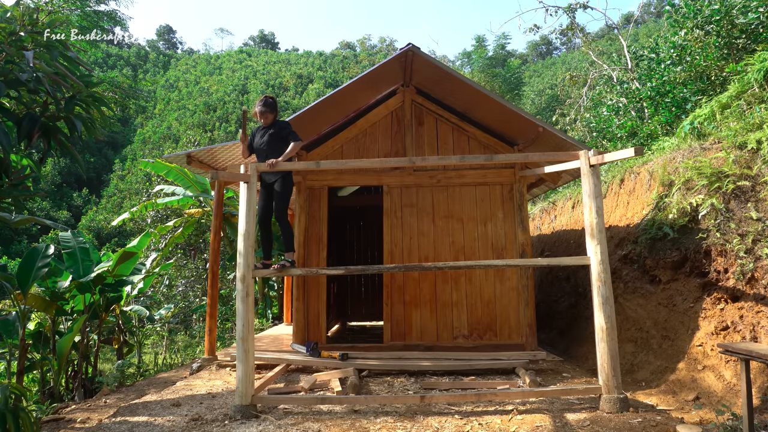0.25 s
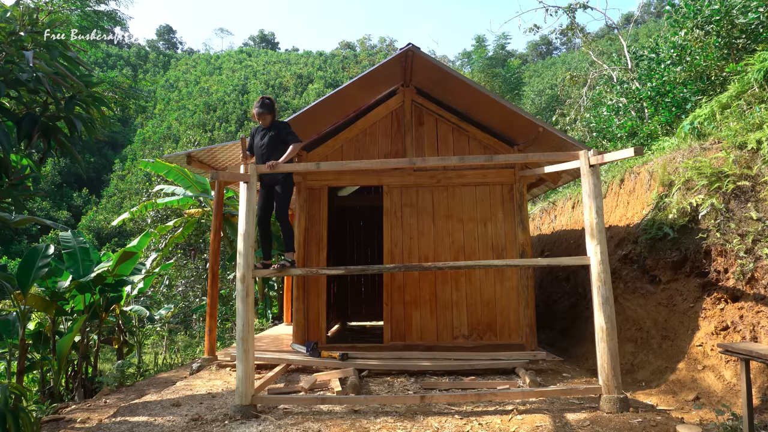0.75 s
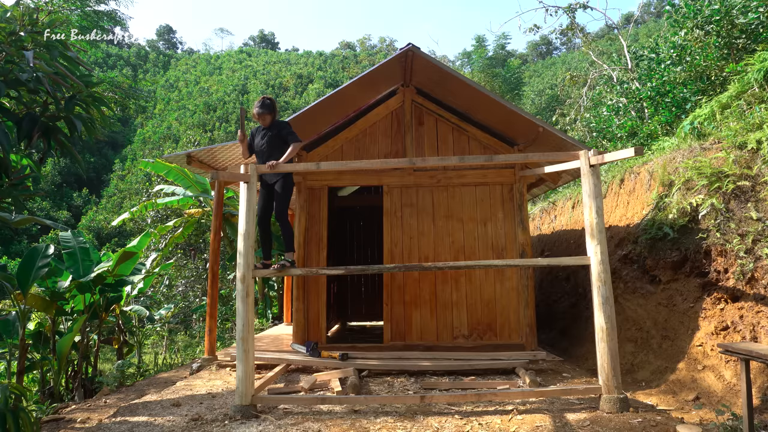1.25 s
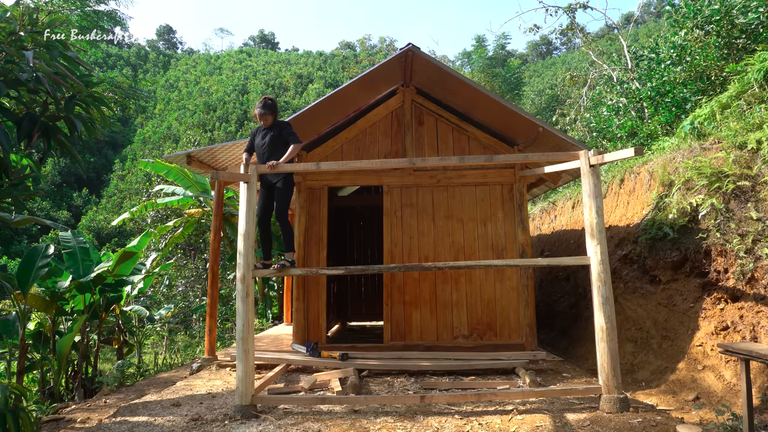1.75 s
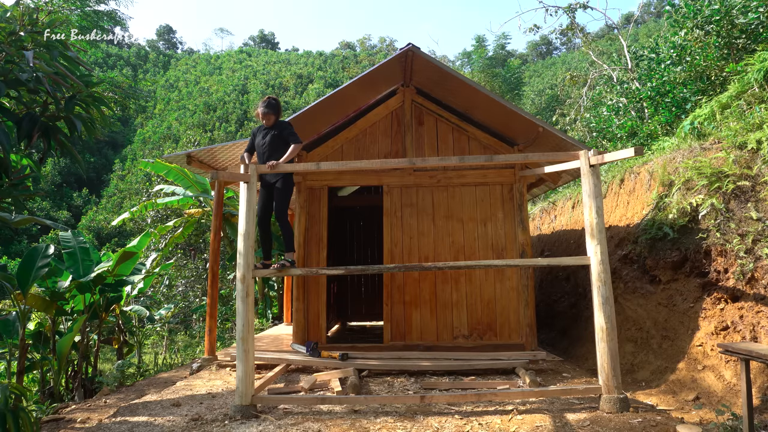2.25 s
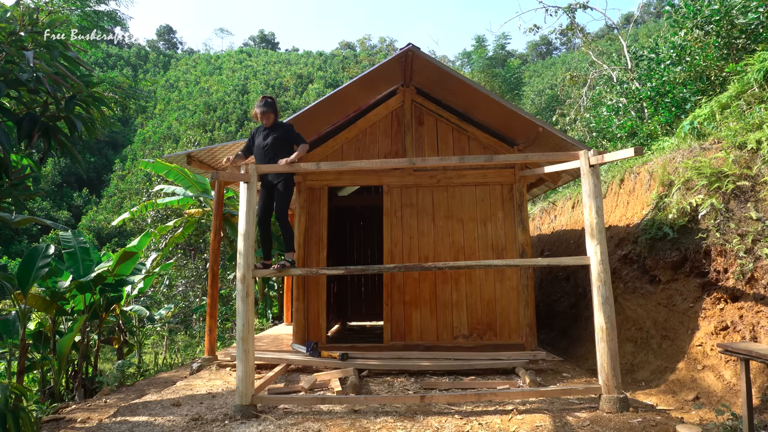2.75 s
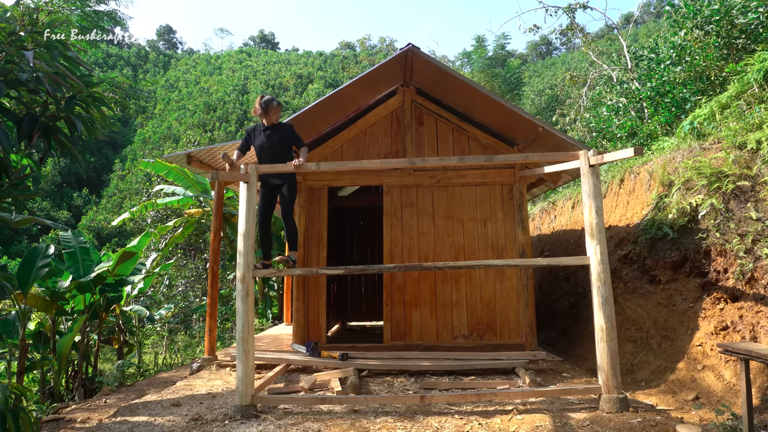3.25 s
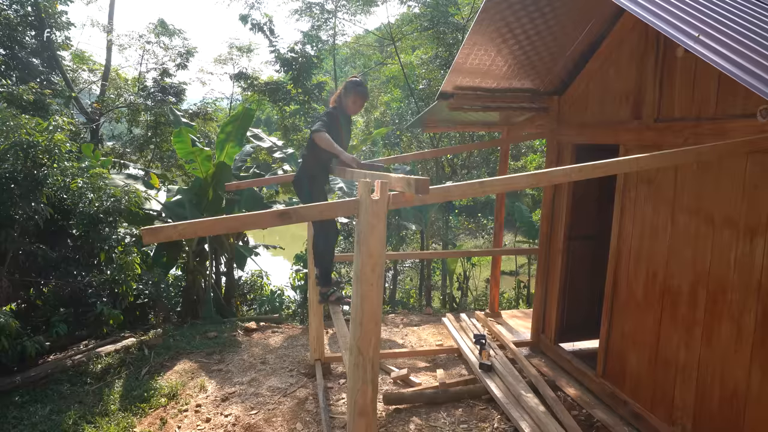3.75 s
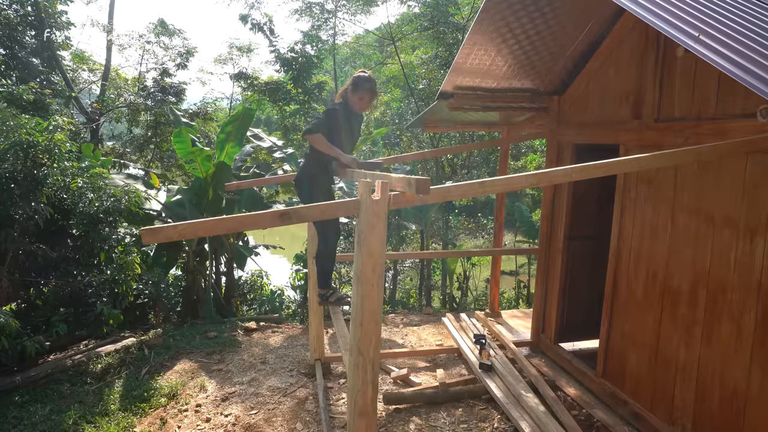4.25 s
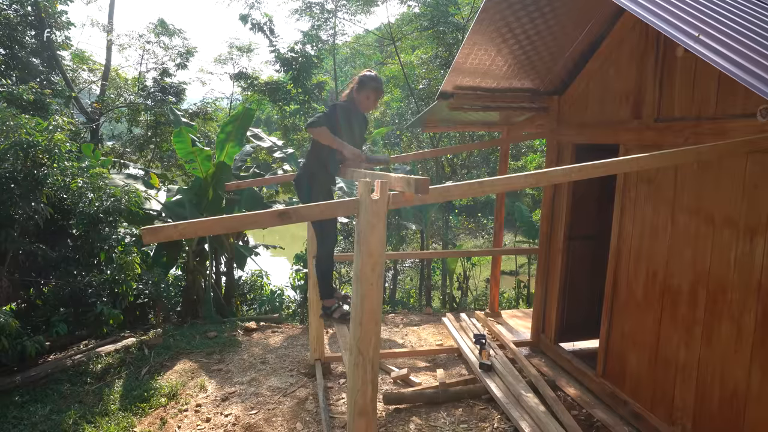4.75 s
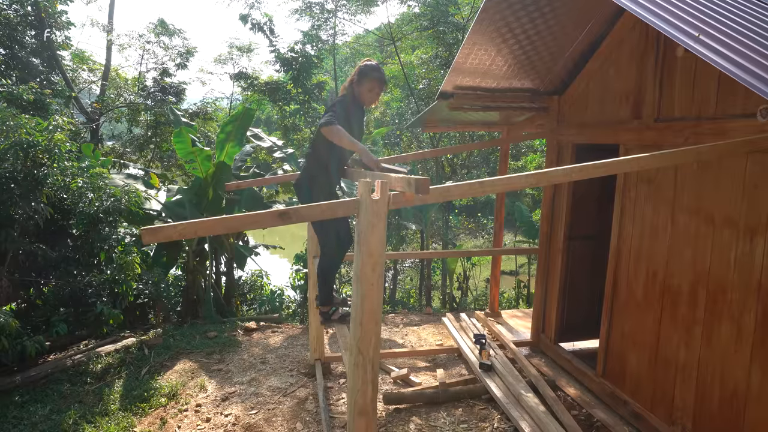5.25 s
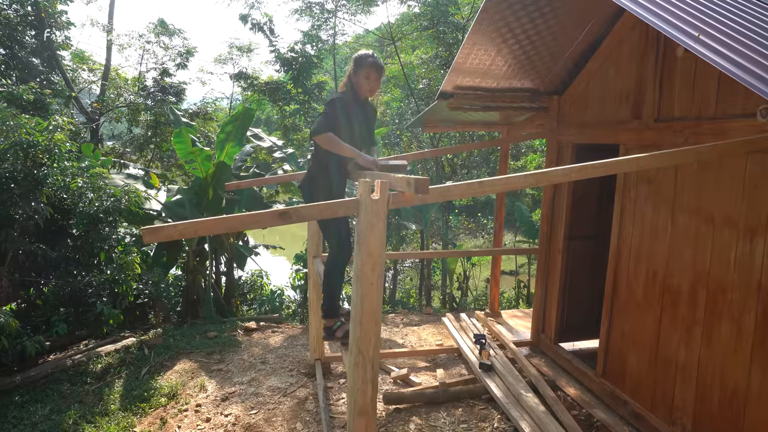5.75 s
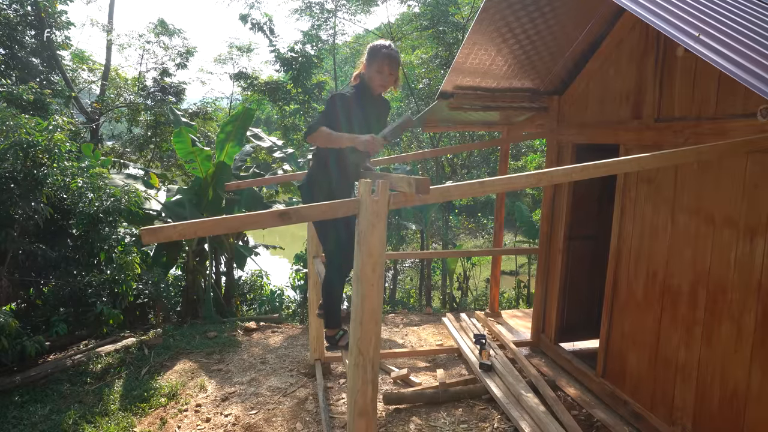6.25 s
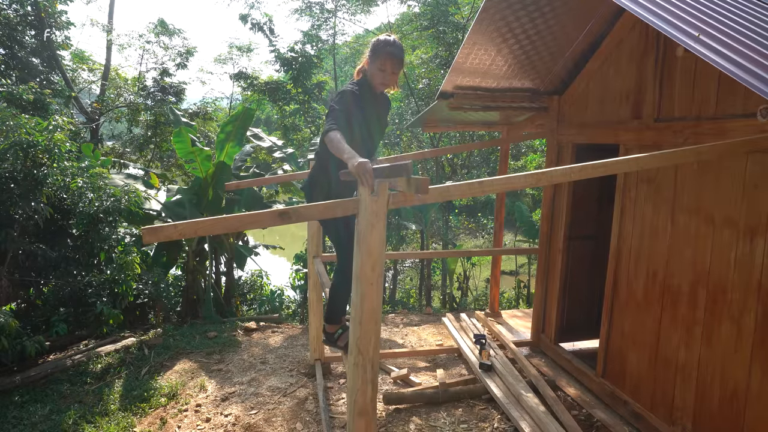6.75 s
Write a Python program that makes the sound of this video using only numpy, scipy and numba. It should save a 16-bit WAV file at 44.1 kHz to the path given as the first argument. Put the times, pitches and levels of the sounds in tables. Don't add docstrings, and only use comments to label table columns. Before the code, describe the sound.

Sharp steel-on-nail cracks with woody, resonant knocks, heard from a little way off, fill the first two and a half seconds, their loud peaks flattened and their tails scattered around a hut. Then the view is nearer and much quieter: dull timber set-downs, tiny clicks, short scrapes and a low drag. A high cicada shimmer, pulsing crickets, tiny whistled bird peeps and airy leaf hiss surround it in wide stereo.

```python
import sys
import numpy as np
from scipy import signal
from scipy.fft import rfft, irfft, next_fast_len
from scipy.io import wavfile
from scipy.ndimage import uniform_filter1d, map_coordinates
from numba import njit

SR = 44100
rng = np.random.default_rng(int(sys.argv[2]) if len(sys.argv) > 2 else 0)


def dump_mix(stems):
    frames = np.atleast_2d(stems).T
    limited = np.clip(frames, -1, 1)
    pcm = np.round(limited * 32767).astype(np.int16)
    wavfile.write(sys.argv[1], SR, pcm)


def gain_from_db(level_db):
    decades = np.asarray(level_db, float) / 20
    return 10 ** decades


N = 309582
LEAD = 22050
CUT_S = 3.535

# start in seconds, strength in dB, crack in dB, boom in dB, scatter in dB.
BLOWS = [(-.44, 0, 0, -11, -5.5), (.105, -26.5, -31, -7, 18), (0.5463, -3, -0.5, -13.5, -9),
         (0.622, -19.5, -12, -7.5, -22), (.702, -21.5, -24, -8, -8), (0.9595, -6, -5, -21.5, -9.5),
         (1.4381, -3.5, -3, -19.5, -9.5), (1.509, -13, -3, -20, -15.5), (1.7827, -10.5, -1, -20.5, -12),
         (2.277, 0, -9.5, -33.5, -9.5), (2.343, -12.5, -22, -23, -25)]
# start in seconds, strength in dB, brightness in dB per octave, boom in dB, scatter in dB.
THUDS = [
    (.052, -16, 5, -31, -38),
    (.068, -24, 0.5, -9, -32),
    (2.891, -41.5, 0.5, -5, -13),
    (3.713, -34, -1, -9.5, -11),
    (3.727, -30, 0, -17.5, -45),
    (5.334, -38.5, -6, -13, -1),
    (5.358, -39.5, -7, -2.5, -15),
    (6.65, -41.5, 2, 0.5, -36),
    (6.745, -46.5, -3.5, -19, -4),
]
# start in seconds, peak in dB, centre in Hz, width in octaves, t60 in seconds.
TICKS = [(0.0498, -21, 2600, 1.3, 0.014), (0.0573, -25, 11000, 1.3, .012), (.0655, -27, 8300, 1.1, 0.013),
         (0.1025, -33, 5950, 0.85, 0.014), (0.717, -23.5, 363, 0.98, 0.42), (.72, -44, 4000, 0.87, 0.084),
         (3.386, -45, 2670, 0.29, 0.013), (3.39, -48, 600, 1.3, 0.085), (3.398, -52, 2500, 0.4, 0.03),
         (3.713, -40, 4970, 0.78, 0.021), (4.128, -37, 9100, 1.9, 0.019), (4.312, -44.5, 1060, 1.2, 0.13),
         (4.334, -61, 1390, 0.41, 0.13), (4.732, -50, 3000, 1.4, .03), (5.33, -50.5, 2290, 0.55, 0.082),
         (5.431, -36.5, 1200, 0.39, 0.037), (5.63, -50, 1420, 0.65, 0.33), (5.68, -35.5, 3520, 0.86, 0.057),
         (5.69, -32.5, 3600, 2.6, 0.033), (5.955, -47, 7000, 1.1, .03), (6.528, -46.5, 1140, 0.36, 0.094),
         (6.648, -46, 2200, 0.81, 0.033), (6.747, -42, 2190, .6, 0.032), (6.773, -28, 174, 0.22, 0.19)]
# middle in seconds, length in seconds, level in dB, centre in Hz, width in octaves.
SCUFFS = [
    (3.608, 0.14, -59.5, 4960, 0.76),
    (3.964, 0.048, -62, 2700, 0.37),
    (4.255, 0.034, -54, 2500, 0.64),
    (5.973, 0.29, -53.5, 6000, 2.1),
    (4.354, 0.08, -60, 1500, 1),
    (5.35, 0.054, -59, 2480, 0.52),
    (5.71, 0.063, -51, 2450, 0.84),
    (6.148, 0.41, -56, 640, 1),
    (6.27, 0.034, -53.5, 1410, 1.1),
    (6.511, 0.052, -52, 1920, 0.92),
]
# start in seconds, length in seconds, from in Hz, to in Hz, level in dB.
BIRDS = [
    (2.862, .035, 2600, 4500, -66),
    (3.458, .05, 3250, 4700, -60),
    (4.18, .04, 3350, 3340, -67),
    (4.4, .03, 3600, 3590, -67),
    (5.385, .04, 3200, 3190, -64),
    (4.585, .045, 2750, 2760, -64),
    (5.94, .05, 2700, 2750, -64),
    (6.39, .06, 4400, 3100, -63),
    (6.855, .04, 3900, 3200, -63),
]
# frequency in Hz, level in dB per Hz.
AIR_COLOUR = [(25, -1.5), (60, 1.5), (300, 0), (1000, -5), (3000, -12.5), (7000, -28), (15500, -46)]
# frequency in Hz, left-right likeness (1 is the same).
AIR_LIKENESS = [(60, 1), (130, 0.74), (290, 0.52), (640, 0.29), (1410, 0.084), (3100, 0.28), (6820, 0.76),
                (15000, 0.39)]
# frequency in Hz, level in dB per Hz.
TIMBER_COLOUR = [(71, -71), (120, -21.5), (410, -15), (592, 0), (773, -8), (988, -2), (1120, -2.5),
                 (1290, -1), (1370, -4), (1580, -2), (1750, -6.5), (2530, -14.5), (16000, -44)]
# frequency in Hz, level in dB per Hz.
BEAM_COLOUR = [(71, -29), (120, -2), (280, -7), (404, -7), (671, -3), (1440, -18.5), (1540, -23.5),
               (2530, -23), (3500, -42.5), (4550, -57), (7700, -120)]
# frequency in Hz, width in Hz, height over the broad sound in dB.
FRAME_MODES = [(286, 46, 11.5), (473.5, 14.5, 10.5), (592.6, 15, 6.5), (616, 27, 6.5), (745, 41, 8),
               (842, 10, 7), (998, 78, 4), (1113, 38, 3.5), (1321, 29, 4), (1418, 21, 1.5), (1834, 23, -2),
               (2080, 13, 5.5), (2120, 25, -5), (2304, 35, 4)]
# frequency in Hz, level in dB per Hz.
STEEL_COLOUR = [(300, -18), (1200, 3.5), (2100, 25), (3500, 0.5), (8000, 4), (10500, -11), (13000, -10),
                (16000, -31)]
# frequency in Hz, t60 in seconds.
KNOCK_DECAY = [(100, 1), (500, 0.29), (1500, 0.17), (4000, 0.11), (12000, 0.11)]
# frequency in Hz, t60 in seconds.
YARD_DECAY = [(100, 1), (300, 1), (600, 0.75), (1300, 0.89), (2200, 0.74), (4000, 0.69), (10000, 0.82)]
# delay in seconds, level in dB, rise in seconds, fade in seconds, centre in Hz.
ECHOES = [
    (.075, -24.5, 0.0057, 0.037, 2100),
    (.17, -34.5, 0.015, 0.084, 1000),
    (.27, -42, 0.058, 0.12, 1270),
    (0.404, -42, 0.015, 0.11, 1300),
    (.5, -45.5, 0.02, 0.17, 1400),
]
# frequency in Hz, left-right likeness (1 is the same).
SCATTER_LIKENESS = [(60, 1), (130, 1), (290, 1), (640, 0.98), (1410, 0.8), (3100, 0.49), (6820, 0.12),
                    (15000, 0.092)]
# frequency in Hz, left minus right in dB.
LEFT_OVER_RIGHT = [(200, 0), (500, .8), (2400, .8), (4400, 2), (8000, 2.5), (15000, 5)]
# frequency in Hz, level in dB per Hz.
LEAF_COLOUR = [(1500, -10.5), (3000, -0.5), (6000, -2.5), (9600, -3.5), (12000, -6), (15500, -9)]
# frequency in Hz, width in Hz, height in dB.
HUT_MODES = [(59.6, 42, -5), (79.6, 10.4, -2.5), (107.2, 9, 0), (161.6, 13.4, -5.5), (233.5, 68, -6.5)]
# time in seconds, strength in dB.
GUSTS = [
    (0, 12.5),
    (.3, 6.5),
    (1.3, 0),
    (2.2, -1),
    (3.3, 0),
    (4.2, 1.7),
    (5, -0.1),
    (5.8, 2.2),
    (6.5, -0.2),
    (7.02, -0.2),
]
# start in seconds, length in seconds, level in dB.
LOW_PHRASES = [
    (.55, .3, -66),
    (5.15, .5, -74),
    (6.2, .9, -67),
]
# start in seconds, length in seconds, level in dB.
HIGH_PHRASES = [
    (2.42, 0.33, -71.5),
    (4.65, .45, -67.5),
    (5.7, .3, -82),
    (6.35, 0.46, -69),
]


def timber():
    track = new_track()
    for s, db, crack_db, *room in BLOWS:
        tilt_db = 1.52 + 0.3234 * db
        blow = strike(TIMBER_COLOUR, crack_db, tilt_db, *room, stretch=0.63, echo_db=-2)
        add(track, gain_from_db(db - 5.5) * blow, s)
    for s, db, *blow in THUDS:
        add(track, gain_from_db(db) * strike(BEAM_COLOUR, -60, *blow, stretch=0.65, echo_db=-6), s)
    return track[:, LEAD:LEAD + N]


def strike(body, crack_db, tilt_db, boom_db, yard_db, stretch, echo_db):
    lumps = gain_from_db(1.5 * wobble(160)[:SR] + 0.4 * wobble(35)[:SR])
    noise = lumps * stereo(rng.standard_normal((2, SR)), SCATTER_LIKENESS)
    hz, t, z = signal.stft(noise, SR, nperseg=128)
    tail_power = gain_from_db(2 * yard_db - 120 * t / (stretch * along(YARD_DECAY, hz)[:, None]))
    for delay, db, rise, fade, centre_hz in ECHOES:
        shape = np.exp(-((t - delay) / np.where(t < delay, rise, fade)) ** 2)
        echo_colour = bell(centre_hz, 0.9)(hz)[:, None]
        tail_power = tail_power + gain_from_db(2 * (db + echo_db + echo_colour)) * shape
    knock_gain = gain_from_db(-60 * t / (stretch * along(KNOCK_DECAY, hz)[:, None]))
    knock = signal.istft(z * knock_gain, SR, nperseg=128)[1][:, :SR]
    tail = signal.istft(z * np.sqrt(tail_power), SR, nperseg=128)[1][:, :SR]

    modes = peaks(FRAME_MODES, 0.53)

    def tone(f):
        low_cut = 20 * np.log10((f * f + 1) / (f * f + 70 ** 2))
        return along(body, f) + tilt_db * np.log2(np.maximum(f, 150) / 800) + low_cut

    wood = coloured(knock, lambda f: tone(f) + 5 * np.log10(1 + modes(f)))
    wood = wood + coloured(tail, lambda f: tone(f) + 10 * np.log10(1 + modes(f)))
    wood = wood / np.sqrt(np.mean(wood[:, :SR // 20] ** 2))
    t = np.arange(SR) / SR
    wood = wood * (1 - 0.74 * np.exp(-(t / 0.002) ** 2))

    crack_noise = gain_from_db(crack_db - 60 * t / 0.0068) * rng.standard_normal(SR)
    crack = coloured(crack_noise, lambda f: along(STEEL_COLOUR, f))

    hollow = peaks(HUT_MODES, 1.5)
    boom = unit(coloured(rng.standard_normal(SR),
                         lambda f: 20 * np.log10(hollow(f) * (f ** 4 + 1) / (f ** 4 + 60 ** 4))))
    swing = 1 - np.exp(-t / 0.08)
    boom = gain_from_db(boom_db + 6.5 - 60 * t / (1.11 * stretch)) * swing * boom
    return wood + boom + crack * gain_from_db([[2.5], [-2.5]])


def handling():
    track = new_track()
    t = np.arange(SR // 2) / SR
    for s, db, hz, octaves, t60 in TICKS:
        noise = stereo(rng.standard_normal((2, len(t))), SCATTER_LIKENESS)
        burst = unit(coloured(noise, bell(hz, octaves)))
        swell = 1 - np.exp(-t * hz / 2)
        add(track, gain_from_db(db - 60 * t / t60) * swell * burst, s)
    for s, length, db, hz, octaves in SCUFFS:
        clumps = gain_from_db(2 * rng.standard_normal(len(t) // 50).repeat(50))
        grains = rng.standard_normal((2, len(t))) * clumps
        swell = np.exp(-(2 * (t - t.mean()) / length) ** 2)
        add(track, gain_from_db(db) * swell * unit(coloured(grains, bell(hz, octaves))), s - t.mean())
    return track[:, LEAD:LEAD + N]


def birds():
    track = new_track()
    for s, length, from_hz, to_hz, db in BIRDS:
        bend = 4 if to_hz > from_hz > 3000 else 1
        u = np.linspace(0, 1, round(length * SR))
        pitch_hz = from_hz + (to_hz - from_hz) * u ** bend
        call = np.sin(2 * np.pi * np.cumsum(pitch_hz) / SR) * np.sin(np.pi * u) ** 0.2
        blur_gain = gain_from_db(-36 - 60 * np.arange(SR // 10) / SR / 0.12)
        blur = blur_gain * rng.standard_normal((2, SR // 10))
        blur[:, 0] = 1
        add(track, gain_from_db(db) * signal.fftconvolve(call[None], blur, axes=1), s)
    return track[:, LEAD:LEAD + N]


def insects():
    def song(hz, octaves, alike):
        noise = coloured(rng.standard_normal((2, N)), bell(hz, octaves))
        return unit(stereo(noise, [(hz, alike)]))

    cicada_db = spot(far_db=-58.5, near_db=-54) + 0.37 * curves(GUSTS)[0]
    cicada_flutter_db = 1.14 * wobble(30) + 0.63 * wobble(5.2)
    cicadas = gain_from_db(cicada_db + cicada_flutter_db) * song(8723, 0.055, -0.31)
    low_gain = (gain_from_db(spot(far_db=-68, near_db=-66)) + phrases(LOW_PHRASES)) / 2
    low_cricket = low_gain * gain_from_db(2.5 * wobble(32)) * song(4480, 0.081, 0.2)
    high_cricket = phrases(HIGH_PHRASES) * gain_from_db(1.8 * wobble(30)) * song(4960, 0.042, 0.3)
    return cicadas + low_cricket + high_cricket


def breeze():
    gust_db = curves(GUSTS)[0]
    air_db = spot(far_db=-58.5, near_db=-54.5) + gust_db
    leaves_db = spot(far_db=-67, near_db=-60.5) + 0.22 * gust_db
    z = signal.stft(rng.standard_normal((2, N)), nperseg=512)[2]
    patches = uniform_filter1d(rng.standard_normal(z.shape[1:]), 6, 0)
    patches = uniform_filter1d(patches, 14, 1)
    pair = signal.istft(z * gain_from_db(1.3 * unit(patches)), nperseg=512)[1][:, :N]
    air = unit(coloured(stereo(pair, AIR_LIKENESS), lambda hz: along(AIR_COLOUR, hz)))
    leaves = unit(coloured(rng.standard_normal((2, N)), lambda hz: along(LEAF_COLOUR, hz)))
    return gain_from_db(air_db) * air + gain_from_db(leaves_db) * leaves


def scene():
    return timber() + handling() + birds() + insects() + breeze()


def new_track():
    return np.zeros((2, LEAD + N + SR))


def add(track, sound, s):
    start = LEAD + round(s * SR)
    track[:, start:start + sound.shape[1]] += sound


def unit(x):
    return x / np.sqrt(np.mean(x ** 2) + 1e-20)


def along(points, hz):
    f, v = np.transpose(points)
    return np.interp(np.log(hz + 1), np.log(f + 1), v)


def curves(rows):
    s, *cols = np.transpose(rows)
    return [np.interp(np.arange(N) / SR, s, c) for c in cols]


def wobble(rate):
    knots = rng.standard_normal(int(N * rate / SR) + 4)
    return map_coordinates(knots, [np.arange(N) * rate / SR])


def coloured(x, level_db):
    m = 2 * next_fast_len(x.shape[-1] // 2 + 8192)
    gain = gain_from_db(level_db(np.fft.rfftfreq(m, 1 / SR)))
    cepstrum = irfft(np.log(gain + 1e-6), m)
    cepstrum[1:m // 2] *= 2
    cepstrum[m // 2 + 1:] = 0
    return irfft(rfft(x, m) * np.exp(rfft(cepstrum)), m)[..., :x.shape[-1]]


def stereo(pair, alike):
    likeness = along(alike, np.fft.rfftfreq(pair.shape[1], 1 / SR))
    turn = np.arccos(np.clip(likeness, -1, 1)) / 2
    mid, side = irfft(rfft(pair) * [np.cos(turn), np.sin(turn)], pair.shape[1])
    return np.array([mid + side, mid - side])


def bell(centre_hz, octaves):
    return lambda hz: -4.3 * (np.log2((hz + 1) / centre_hz) / octaves) ** 2


def peaks(modes, luck_db):
    luck = rng.normal(0, luck_db, len(modes))
    return lambda f: sum(gain_from_db(2 * (db + d)) / (1 + (2 * (f - centre) / width) ** 2)
                         for (centre, width, db), d in zip(modes, luck))


def spot(far_db, near_db):
    return np.where(np.arange(N) < CUT_S * SR, far_db, near_db)


def phrases(rows):
    t = np.arange(N) / SR
    edge_s = 0.038
    return sum(gain_from_db(db) * np.clip(np.minimum(t - s, s + length - t) / edge_s + 0.5, 0, 1)
               for s, length, db in rows)


@njit
def follow(size, rise, fall):
    out, level = np.empty_like(size), 0.
    for i in range(len(size)):
        level += (size[i] - level) * (rise if size[i] > level else fall)
        out[i] = level
    return out


def low_pass(x):
    return signal.sosfilt(signal.butter(12, 16850, fs=SR, output="sos"), x)


def record(dry):
    hz = np.fft.rfftfreq(N, 1 / SR)
    top_cut = 1 / (1 + (hz / 15900) ** 80)
    balance = gain_from_db(along(LEFT_OVER_RIGHT, hz) / 2 * [[1], [-1]])
    ports = irfft(rfft(dry) * top_cut * balance, N)
    level = follow(np.abs(ports).max(0), 1 / (0.0001 * SR), 1 / (0.012 * SR))
    held = ports / (1 + (level / gain_from_db(-6.5)) ** 4) ** 0.31
    held = held / (1 + np.abs(held / 0.8) ** 6) ** (1 / 6)
    return low_pass(held)


dry = scene()
out = record(dry)
dump_mix(out)
```